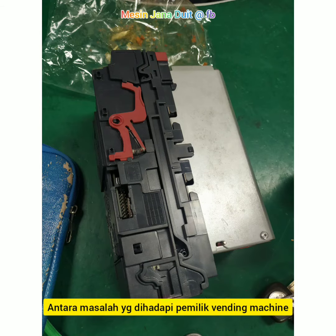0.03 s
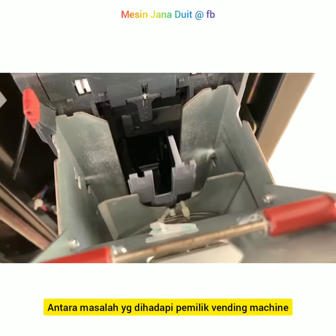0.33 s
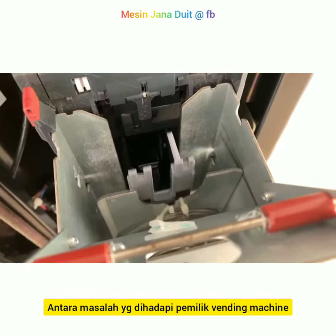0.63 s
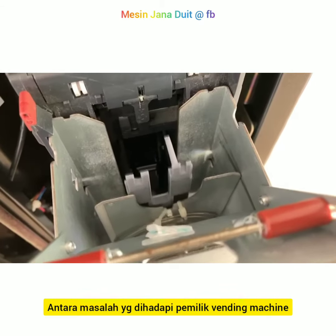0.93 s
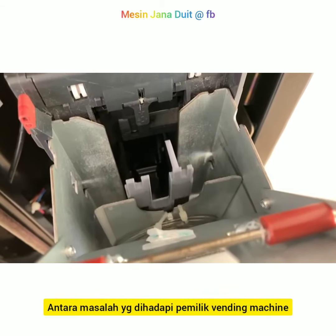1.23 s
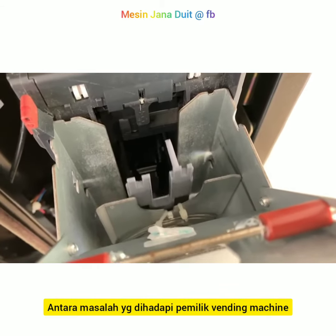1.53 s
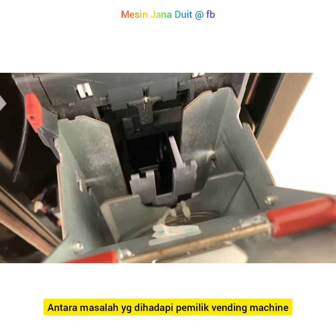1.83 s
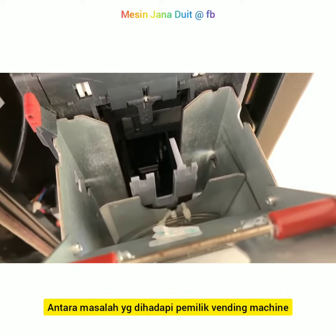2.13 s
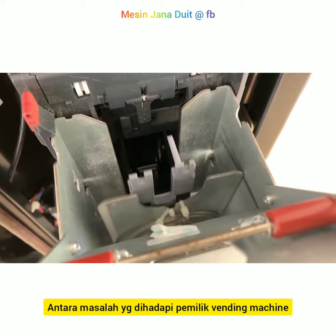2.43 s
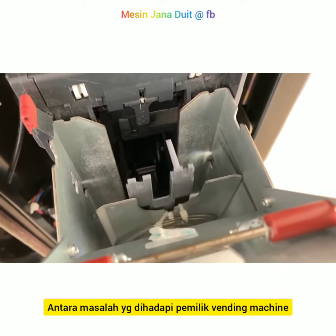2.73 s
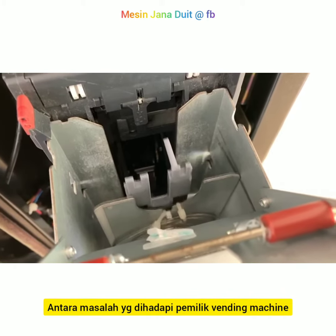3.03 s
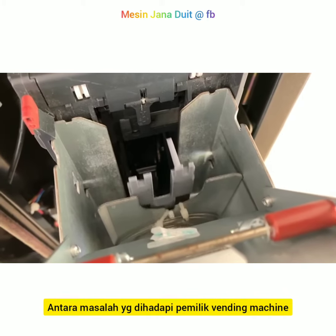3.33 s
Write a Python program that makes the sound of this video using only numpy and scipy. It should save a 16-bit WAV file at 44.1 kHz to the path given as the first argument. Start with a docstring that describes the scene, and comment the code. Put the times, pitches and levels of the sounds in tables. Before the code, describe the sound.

A small geared motor starts inside a vending machine, whirring and grinding with fast, even clacks in its plastic housing. After about three seconds it winds down, leaving two faint ticks and a low hum in a quiet room.

```python
"""Inside a vending machine, a small geared motor runs for three seconds, then coasts to a stop.
Tooth impacts excite the resonances of the plastic housing as a grind, with a whine of gear tones.
Once a turn, about twelve times a second, a part clacks, scrapes and rubs. Two faint ticks follow as
the gears settle. The panels ring and the walls reflect it all, over a quiet rumble, hum and hiss."""
import sys
import numpy as np
from scipy import signal
from scipy.fft import rfft, irfft, next_fast_len
from scipy.io import wavfile
from scipy.ndimage import map_coordinates

SR = 44100
rng = np.random.default_rng(int(sys.argv[2]) if len(sys.argv) > 2 else 0)


def log_audio(samples):
    """Write samples as a 16-bit WAV file to the path given in sys.argv[1]."""
    # one column per channel
    frames = np.atleast_2d(samples).T
    # limit to full scale, then quantise
    limited = np.clip(frames, -1, 1)
    pcm = np.round(limited * 32767).astype(np.int16)
    wavfile.write(sys.argv[1], SR, pcm)


N = 158760


# Effort of the motor. Each row: time in seconds, gain in dB.
EFFORT = [(.19, -25.5), (.225, 4), (.26, 3.5), (.35, 3.5), (.42, 2), (.75, 2), (1.3, 0), (2.3, 0),
          (3.2, 0.5), (3.26, -1.5), (3.31, -2.5), (3.35, -5.5), (3.42, -12), (3.47, -36), (3.6, -72)]
# The gears are duller at low speed. Each row: time in seconds, treble gain in dB.
TREBLE = [(.2, -10), (.24, -4), (.256, 1.5), (.4, 0), (3.2, 0), (3.3, -2), (3.36, -7), (3.44, -15)]

def motor(crossover_hz=5470):
    """Gear noise grows with effort, and its high frequencies grow with speed."""
    turn_times = passing(np.arange(int(TURNS[-1][1]) + 1))
    gears = (grind(turn_times) + contacts(turn_times) + whine()) * amp(curve(EFFORT))
    body = signal.sosfiltfilt(signal.butter(2, crossover_hz, fs=SR, output="sos"), gears)
    return body + (gears - body) * amp(curve(TREBLE))


# Rotation of the wheel. Each row: time in seconds, position in turns.
TURNS = [(.139, -.6), (.2569, 0), (.3581, 1), (.6187, 4), (.8776, 7), (1.3072, 12), (1.8215, 18),
         (2.4193, 25), (3.1879, 34), (3.2937, 35), (3.46, 35.7)]

def passing(turns):
    """Inverting the wheel's motion gives the times at which it reaches these positions."""
    seconds, position = np.transpose(TURNS)
    return np.interp(turns, position, seconds)


def tooth_impacts(teeth=54, jitter_teeth=.55, wear_db=3, scatter_db=4):
    """Gear meshing gives one impact per tooth; the pattern of wear repeats every turn."""
    tooth = np.arange(int(TURNS[0][1] * teeth), int(TURNS[-1][1] * teeth))
    wear = wear_db * rng.uniform(-1, 1, teeth)
    late, size = rng.uniform(-1, 1, (len(tooth), 2)).T
    onsets = np.round(passing((tooth + jitter_teeth * late) / teeth) * SR).astype(int)
    return unit(np.bincount(onsets, amp(wear[tooth % teeth] + scatter_db * size), N))


# Excitation spectrum of the grinding. Each row: frequency in Hz, level in dB.
GRIND_TONE = [(200, -11), (600, -0.5), (1000, -0.5), (1600, -1.5), (3500, 0.5), (5000, -1.5), (6500, -1),
              (8000, -1.5), (11000, -2.5)]

def grind(turn_times):
    """Friction and tooth impacts drive the housing, amplitude-modulated by a brief slack each turn."""
    slack = stroke((.022, .0093, .0018, .0017), turn_times, scatter_db=1.5)
    load = 1 - .22 * slack
    rattle = disperse(tooth_impacts(), ring_s=.0012)
    mesh = amp(-22.5) * grit(spread_db=2.5) + amp(-27.5) * rattle
    return housing(mesh * load * amp(.49 * wobble(60)), GRIND_TONE)


# Excitation spectra of the three contacts. Each row: frequency in Hz, level in dB.
CLACK_TONE = [(300, -3), (900, -7.5), (1600, 3), (4000, 2), (7000, 4), (11000, 4)]
SCRAPE_TONE = [(300, -12.5), (1000, -1.5), (1800, -3), (3000, -9), (4800, -8), (6200, -0.5), (8000, 2),
               (11000, 1.5)]
RUB_TONE = [(300, 12), (1000, -6.5), (1600, -2.5), (3800, -0.5), (6000, -2.5), (11000, -1)]
# Their envelopes. Each lists delay, attack, hold and release time constant, in seconds.
CLACK = (0, .0003, .0012, .0008)
SCRAPE = (0.0022, 0.0025, .0058, .0012)
RUB = (0.0082, 0.0036, 0.014, 0.0033)

def contacts(turn_times):
    """Impact, then sliding friction: a clack, a bright scrape and a rub excite the housing each turn."""
    clack = housing(stroke(CLACK, turn_times, scatter_db=1) * grit(spread_db=3), CLACK_TONE)
    scrape = housing(stroke(SCRAPE, turn_times, scatter_db=1) * grit(spread_db=2.5), SCRAPE_TONE)
    rub = housing(stroke(RUB, turn_times, scatter_db=0) * grit(spread_db=2.5), RUB_TONE)
    return amp(-14.5) * clack + amp(-18.5) * scrape + amp(-24) * rub


# Gear tones. The lists give, for each tone: cycles per turn, level in dB, phase wander in radians.
WHINE_ORDERS = [54, 83, 131.3]
WHINE_DB = [-49, -38.5, -39]
WHINE_DRIFT = [.35, .7, .55]

def whine(flutter_db=0):
    """Rotational orders: tones at fixed ratios to the wheel's rate, heard while it runs at speed."""
    angle = 2 * np.pi * curve(TURNS)
    at_speed = curve([(.35, 0), (.65, 1), (3.15, 1), (3.24, 0)])
    tones = np.zeros(N)
    for order, db, drift in zip(WHINE_ORDERS, WHINE_DB, WHINE_DRIFT):
        level = amp(flutter_db * wobble(25.07))  # constant at 0 dB of flutter
        tones += amp(db) * unit(level * np.sin(order * angle + drift * wobble(22)))
    return at_speed * tones


# Ticks of the settling gears. Each row: start in seconds, level in dB.
TICKS = [(3.449, -32), (3.513, -39.5)]
# Their excitation spectrum. Each row: frequency in Hz, level in dB.
TICK_TONE = [(300, 3), (1200, 5), (3000, -2), (6000, -10), (10000, -20)]

def settling(decay_s=.0028):
    """Damped transients: two dull ticks decay exponentially as the gears come to rest."""
    t = np.arange(N) / SR
    envelope = sum(amp(db) * (t > start) * np.exp(-np.abs(t - start) / decay_s) for start, db in TICKS)
    return housing(envelope * grit(spread_db=5), TICK_TONE)


# Resonances of the plastic housing. Each row: frequency in Hz, relative gain in dB.
HOUSING = [(260, -52), (450, -16.5), (538, -25), (626, -15), (680, -27.5), (758, -24), (882, -2.5),
           (985, 0), (1070, -0.5), (1190, -15.5), (1330, -7), (1530, -2), (1750, -8.5), (1980, -8),
           (2150, -10.5), (2580, -5.5), (2800, -9.5), (3530, -3.5), (3940, -7.5), (4400, -3.5), (5190, -10),
           (6380, -8), (8630, -12.5), (10900, -12.5), (12000, -23.5), (15600, -42), (22000, -120)]

def housing(force, tone):
    """Source and filter: the spectrum of a contact is multiplied by the response of the housing."""
    return colour(force, HOUSING, tone)


def disperse(impacts, ring_s):
    """Multipath travel through the plastic smears impacts in time, here with a flat spectrum."""
    t = np.arange(SR // 50) / SR
    paths = rng.standard_normal(len(t)) * np.exp(-t / ring_s)
    all_pass = irfft(np.exp(1j * np.angle(rfft(paths))))
    return signal.fftconvolve(impacts, all_pass)[:N]


# Panel modes. Each row: frequency in Hz, bandwidth in Hz, gain in dB relative to the direct sound.
PANEL_MODES = [(1064, 36, -13), (1330, 82, -7.5), (1545, 70, -8), (1900, 73, -9), (2058, 30, -6),
               (2294, 37, 1), (2540, 110, -13), (3440, 46, -21), (3686, 71, -10), (4400, 200, -14),
               (4800, 75, -13.5), (6320, 120, -3), (7170, 200, -9), (9500, 370, -10)]

def panels(x):
    """Modal superposition: each mode of the plastic panels adds its ringing to the direct sound."""
    return x + sum(amp(db) * signal.lfilter(*signal.iirpeak(hz, hz / width, fs=SR), x)
                   for hz, width, db in PANEL_MODES)


def reflections(x, t60_s=.049):
    """Reverberation: dense reflections between the cabinet walls die away exponentially."""
    t = np.arange(SR // 4) / SR
    tail = rng.standard_normal(len(t)) * amp(-60 * t / t60_s) * (t > .001)
    return signal.fftconvolve(x, tail / np.linalg.norm(tail))[:N]


# Envelope of the rumble. Each row: time in seconds, level in dB.
RUMBLE_LEVEL = [(.14, -36), (.26, -35.5), (.5, -40.5), (.9, -40.5), (1.4, -46), (3.6, -46)]
# Spectrum of the rumble and partials of the hum. Each row: frequency in Hz, level in dB.
RUMBLE_TONE = [(20, -12), (45, -8.5), (65, 2.5), (90, 2), (130, -1), (190, 1), (270, -1), (330, -5),
               (420, -3), (600, -12), (1000, -30), (3000, -66)]
HUM_PARTIALS = [(48.4, -51), (96.8, -55), (118, -54.5), (242, -55.5)]

def cabinet():
    """Low-frequency vibration: a continuous spectrum is heard as rumble, a line spectrum as hum."""
    t = np.arange(N) / SR
    rumble = amp(curve(RUMBLE_LEVEL)) * colour(rng.standard_normal(N), RUMBLE_TONE)
    hum = sum(amp(db) * unit(np.sin(2 * np.pi * hz * t + .48 * wobble(4.33))) for hz, db in HUM_PARTIALS)
    return rumble + hum


# Spectra of the opening background and of the room hiss. Each row: frequency in Hz, level in dB.
IDLE_TONE = [(290, -28.5), (500, -1.5), (594, -2), (697, -26), (998, -19), (1360, -28), (2050, -34),
             (3770, -41), (4250, -23), (6960, -24), (8160, -41), (10900, -46), (12000, -68), (15600, -98),
             (22000, -120)]
AIR_TONE = [(290, -18.5), (500, -12), (735, -5), (1050, -6.5), (1470, -15), (2050, -20), (5260, -28.5),
            (7140, -17.5), (8380, -34), (11100, -32), (12000, -53), (15600, -77), (22000, -120)]

def hiss():
    """Ambient noise floor: one broadband noise crossfades into a slightly fainter one."""
    early = curve([(.5, .8), (1, .05)])
    idle = amp(-46) * early * colour(rng.standard_normal(N), IDLE_TONE)
    air = amp(-49.5) * (1 - early) * colour(rng.standard_normal(N), AIR_TONE)
    return idle + air


def stroke(shape, times, scatter_db):
    """Convolution places an attack-hold-release envelope after each of the times."""
    delay, attack, hold, release = shape
    t = np.arange(SR // 10) / SR - delay
    envelope = np.clip(t / attack, 0, 1) * np.exp(-np.maximum(t - attack - hold, 0) / release)
    strengths = amp(scatter_db * rng.standard_normal(len(times)))
    hits = np.bincount(np.round(times * SR).astype(int), strengths, N)
    return signal.fftconvolve(hits, envelope)[:N]


def grit(spread_db):
    """Friction noise: dense tiny contacts of uneven but bounded size, at rms 1."""
    return unit(np.tanh(rng.standard_normal(N)) * amp(spread_db * np.tanh(wobble(1200))))


def colour(x, *spectra):
    """Minimum-phase filtering, at unit power gain, through a cascade of (Hz, dB) spectra."""
    size = 2 * next_fast_len(N)
    log_hz = np.log(np.fft.rfftfreq(size, 1 / SR) + 1)
    gain = amp(sum(np.interp(log_hz, np.log(hz + 1), db) for hz, db in map(np.transpose, spectra)))
    cepstrum = irfft(np.log(np.maximum(unit(gain), 1e-6)))
    cepstrum[1:size // 2] *= 2  # folding onto positive time makes the filter causal
    cepstrum[size // 2 + 1:] = 0
    return irfft(rfft(x, size) * np.exp(rfft(cepstrum)))[:N]


def wobble(rate):
    """Spline interpolation through random knots, rate of them a second."""
    return map_coordinates(rng.standard_normal(int(N * rate / SR) + 4), [np.arange(N) * rate / SR])


def curve(rows):
    """Linear interpolation of (seconds, value) rows at every sample."""
    return np.interp(np.arange(N) / SR, *np.transpose(rows))


def amp(db):
    """Decibels to amplitude ratio."""
    return 10 ** (np.asarray(db) / 20)


def unit(x):
    """Normalisation to rms 1."""
    return x / np.sqrt(np.mean(x ** 2) + 1e-20)


def scene():
    """Superposition of the mechanism, its reflections and the background, in one channel."""
    mechanism = panels(motor() + settling())
    return (mechanism + amp(-11.5) * reflections(mechanism) + cabinet() + hiss())[None]


def record(dry):
    """After a moment of silence, soft saturation rounds the peaks and a low-pass limits the band."""
    start_s, ceiling, top_hz = .139, .8, 11900
    opened = dry * curve([(start_s, 0), (start_s + .002, 1)])
    rounded = opened / (1 + np.abs(opened / ceiling) ** 6) ** (1 / 6)
    size = next_fast_len(N + SR // 2)
    passband = np.clip((top_hz - np.fft.rfftfreq(size, 1 / SR)) / 400 + .5, 0, 1)
    return irfft(rfft(rounded, size) * passband, size)[:, :N]


dry = scene()
out = record(dry)
log_audio(out)
```